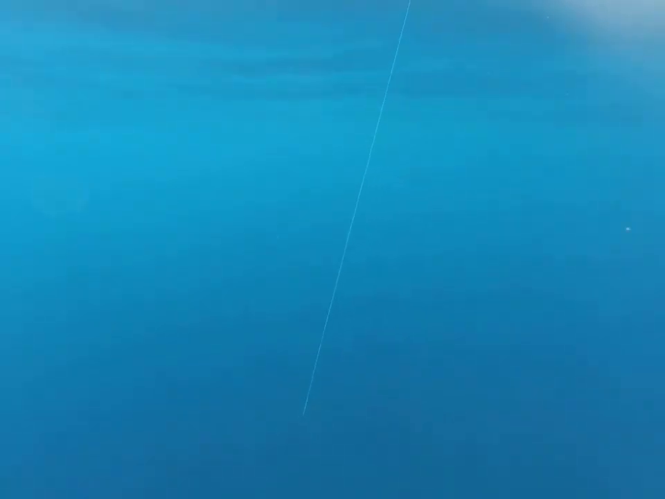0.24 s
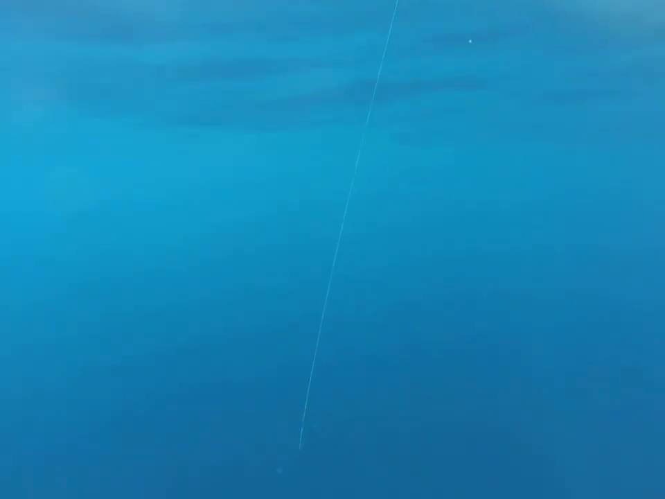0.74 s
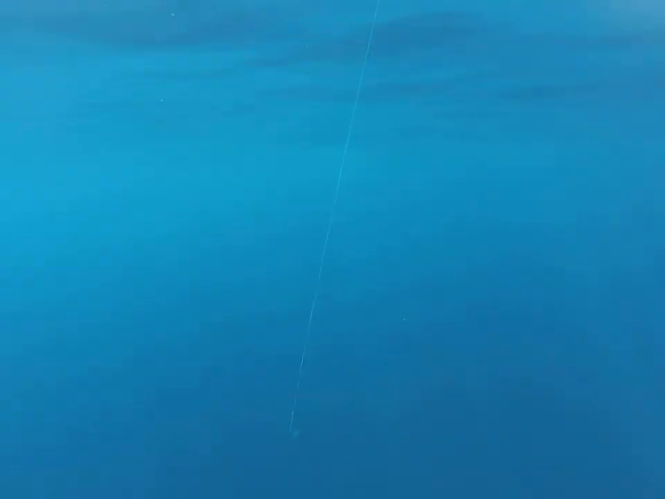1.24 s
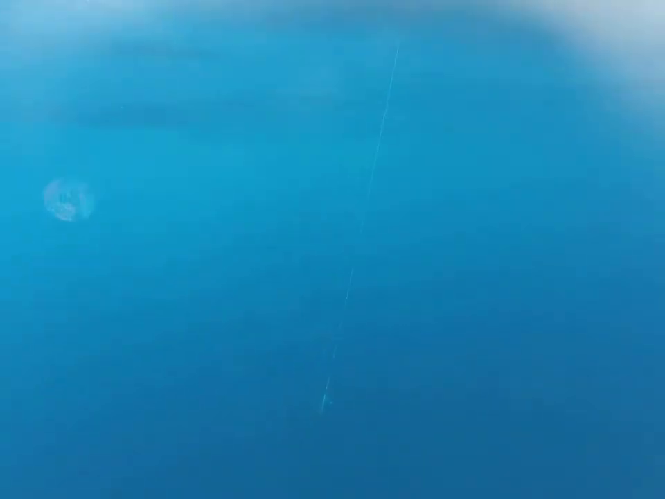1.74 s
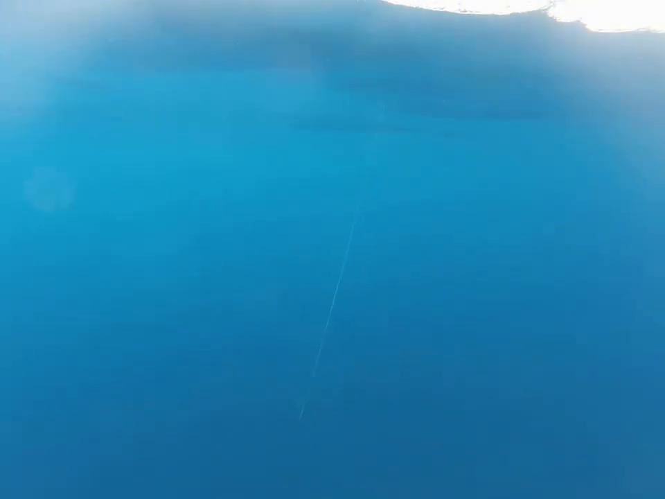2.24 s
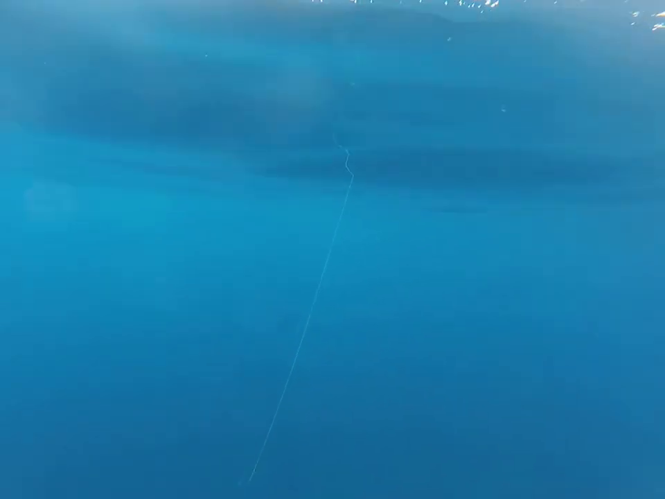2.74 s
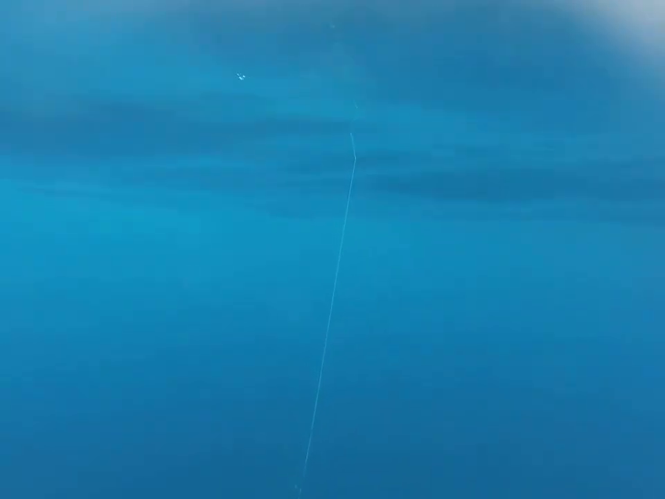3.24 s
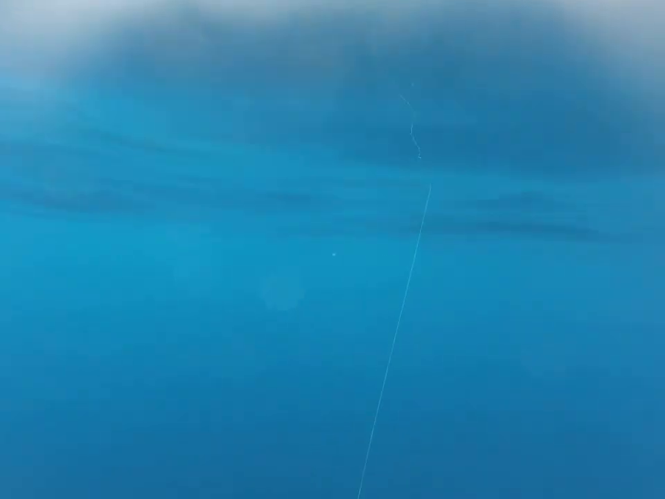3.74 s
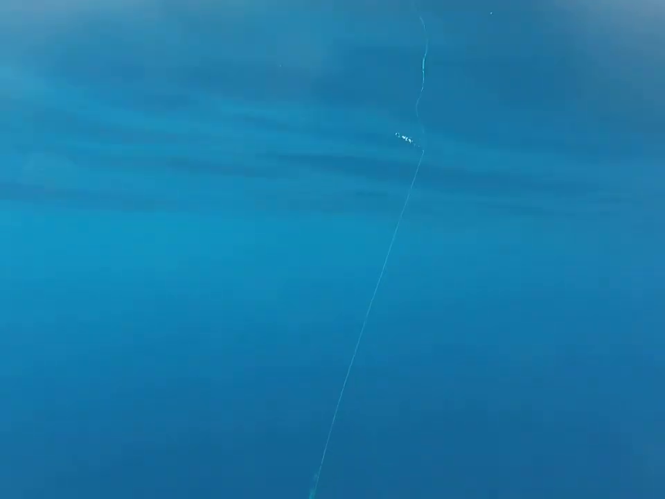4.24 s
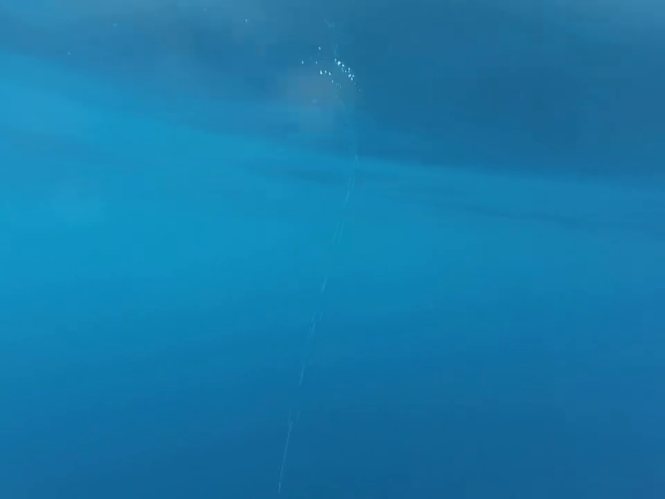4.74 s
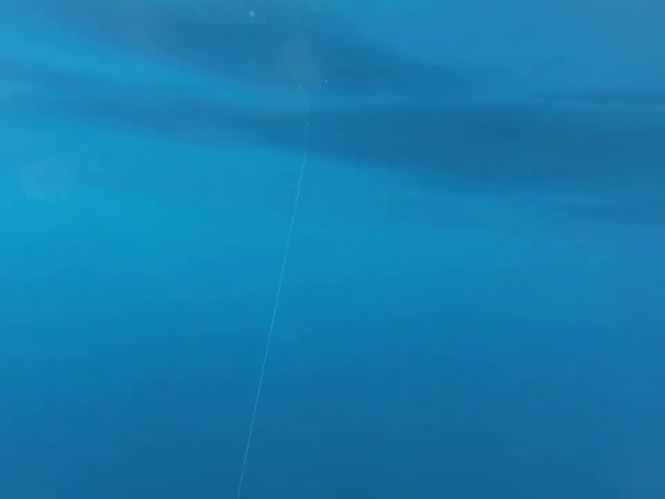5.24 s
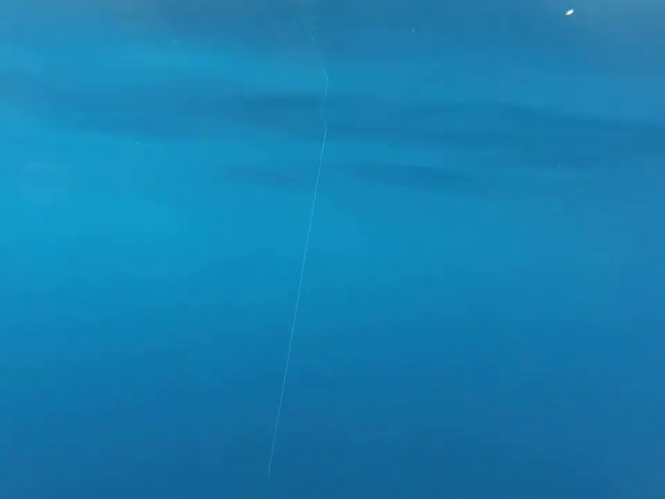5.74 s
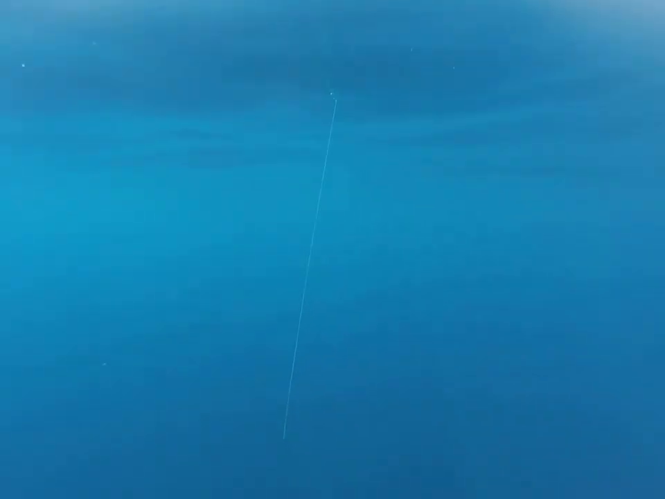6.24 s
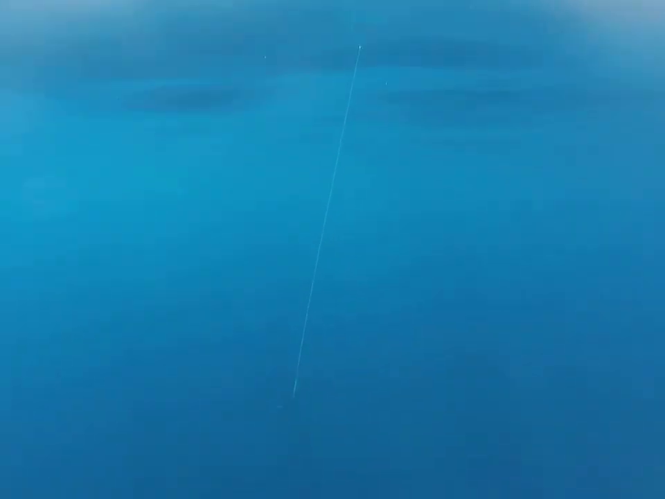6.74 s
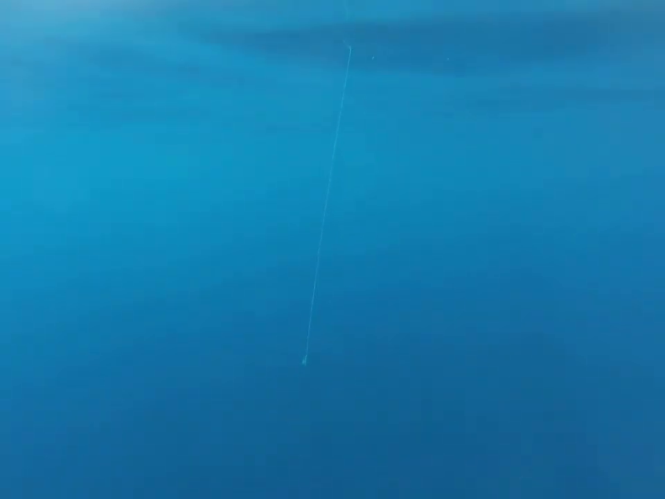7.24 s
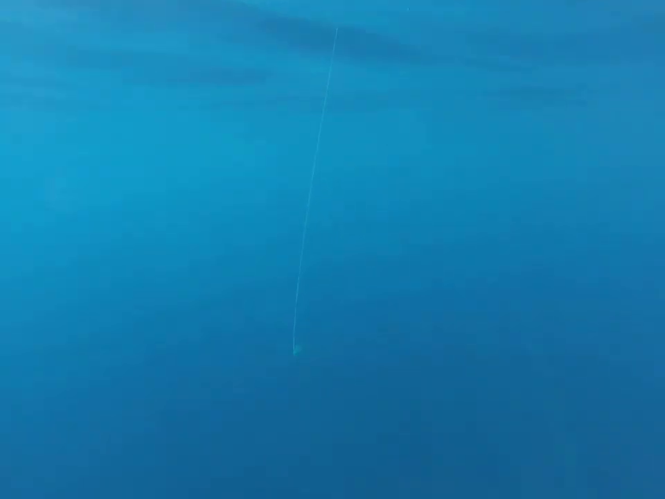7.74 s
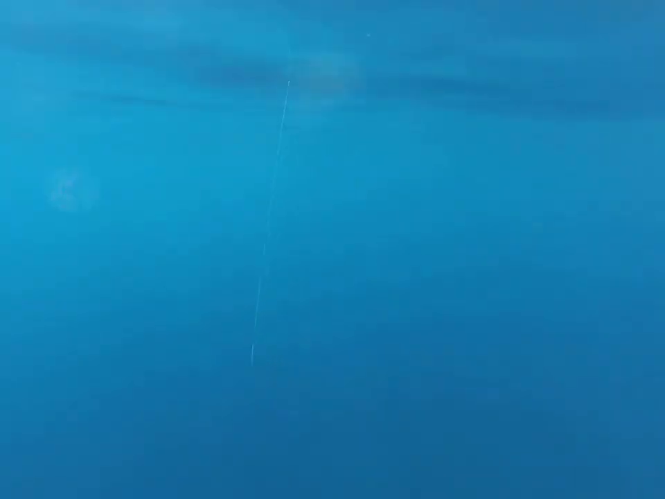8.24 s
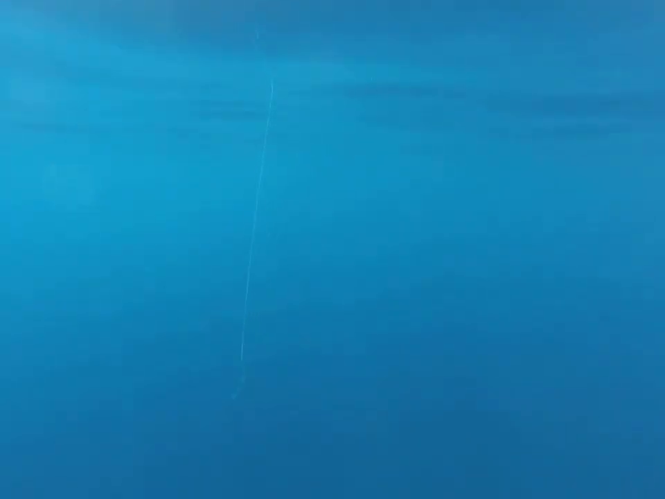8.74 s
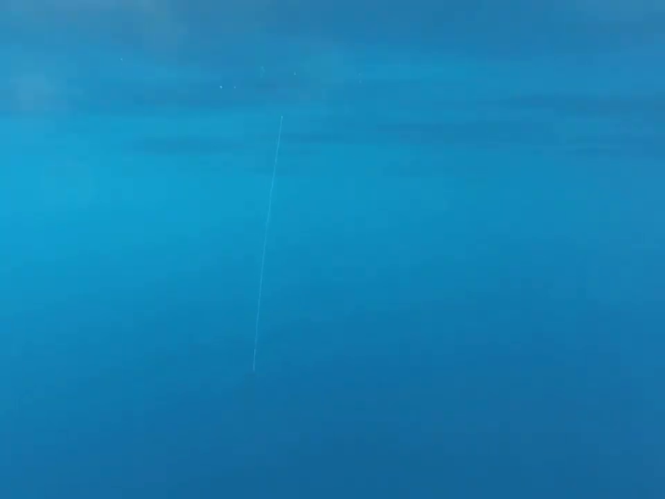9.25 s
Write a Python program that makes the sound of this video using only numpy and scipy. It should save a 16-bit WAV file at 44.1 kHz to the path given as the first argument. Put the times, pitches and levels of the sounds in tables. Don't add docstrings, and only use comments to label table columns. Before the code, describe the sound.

Muffled engine drone and quick ticking inside a submerged housing, low swell thumps, then turbulent water rushes over it, knocking and gulping to the end.

```python
import sys
import numpy as np
from scipy import signal
from scipy.io import wavfile
from scipy.ndimage import uniform_filter1d

SR = 44100
rng = np.random.default_rng(int(sys.argv[2]) if len(sys.argv) > 2 else 0)


def invert_db(level):
    return 10 ** (np.asarray(level, dtype=float) / 20)


def unload_wav(signal):
    wavfile.write(
        sys.argv[1],
        SR,
        np.round(np.clip(np.atleast_2d(signal).T, -1, 1) * 32767).astype(np.int16),
    )


N = 418509

# (time [s], flow level [dB], froth [dB], chop [dB])
WASH = [(1.97, -48, -4, -5), (1.995, -28.5, 1, 0), (2.1, -35.5, -1.5, 7), (2.18, -29.5, 1.5, 6.5),
        (2.3, -28, 0.5, 2), (2.64, -29, 1.5, 0), (3.0, -28.5, 2.5, -3.5), (3.43, -27, -0.5, -0.7),
        (3.8, -26.5, 1.5, 0.5), (4.5, -25, 3.5, 2.5), (4.7, -26.5, 1, 1), (5.4, -26.5, -1, 2.4),
        (6.0, -25, 0, 2), (7.2, -28.5, 0.5, 1), (7.63, -28.5, 0, 1.5), (8.45, -26.5, 0, 5.5),
        (8.75, -31, 0, 1.5), (9.49, -27.5, -0.5, 7)]
# (frequency [Hz], width [Hz], level [dB])
CALM_MODES = [(490, 40, -19), (596, 32, 0), (892, 45, -16), (1345, 55, -14), (1610, 50, -26),
              (1800, 150, -25), (2160, 120, -29), (2520, 50, -28), (3260, 220, -45), (3920, 180, -48)]
CALM_SIDES = [-1, 1, -1, -1, -1, 1, -1, 1, 1, 1]
# (frequency [Hz], width [Hz], level [dB])
WASHED_MODES = [(513, 172, -3), (604.2, 65.7, 6), (948, 45, -16), (1278, 112, -14), (1720, 206, -14.5),
                (2140, 110, -33), (2475, 377, -24.5), (3240, 570, -35.5), (3770, 180, -36),
                (4530, 940, -47), (5484, 305, -37), (6870, 660, -40), (7920, 540, -52.5), (9200, 500, -78),
                (10520, 590, -50), (12200, 500, -59.5), (12700, 690, -59.5), (15100, 1600, -60)]
WASHED_SIDES = [1, -1, 1, 1, 1, -1, -1, -1, -1, 1, 1, 1, -1, 1, -1, 1, -1, 1]


def rms_one(x):
    return x / np.sqrt(np.mean(x ** 2) + 1e-20)


def evened(x, size=SR // 3):
    return x / np.sqrt(uniform_filter1d(x ** 2, size=size) + 1e-20)


def in_time(rows):
    s, level, *rest = np.transpose(rows)
    t = np.arange(N) / SR
    return [np.interp(t, s, level, -120, -120)] + [np.interp(t, s, c) for c in rest]


def drift(rate_hz):
    r = np.exp(-2 * np.pi * rate_hz / SR)
    settled = signal.lfilter([1], [1, -2 * r, r * r], rng.standard_normal(N + SR))[SR:]
    return rms_one(settled)


def band(x, low_hz, high_hz):
    return signal.sosfilt(signal.butter(2, [low_hz, high_hz], "band", fs=SR, output="sos"), x)


def low_pass(x, top_hz, order):
    return signal.sosfilt(signal.butter(order, top_hz, fs=SR, output="sos"), x)


def clicks(rows):
    out = np.full(N, 1e-18)
    for s, db, *_ in rows:
        out[round(s * SR)] = invert_db(db)
    return out


def marked(rows):
    out = np.zeros(N)
    for s, db in rows:
        out[round(s * SR)] = db
    return out


def dying(x, t60_s):
    return signal.lfilter([1], [1, -invert_db(-60 / (t60_s * SR))], x)


def housing(push, modes, sides):
    out = []
    for (hz, width, db), side in zip(modes, sides):
        r = np.exp(-np.pi * width / SR)
        rung = signal.lfilter([1, 0, -1], [1, -2 * r * np.cos(2 * np.pi * hz / SR), r * r], push)
        out.append(side * invert_db(db) * (1 - r * r) / 2 * rung)
    return np.array([m[0] for m in modes]), np.array(out)


def resonance(push, hz, width):
    return housing(push, [(hz, width, 0)], [1])[1][0]


def engine():
    # (time [s], main level [dB], upper-mode strain [dB])
    engine_levels = [
        (0.0, -28, -3),
        (0.3, -30.5, 1),
        (0.45, -29.5, 4.5),
        (0.75, -25.5, 4),
        (1.0, -23.5, -1),
        (1.3, -24.5, 3.5),
        (1.45, -30, 1),
        (1.93, -26, 0.5),
        (1.975, -44, -9),
    ]
    first_tick_s, throb_period_s, throb_lag_s, throb_db = 0.03, 0.11, 0.024, 1
    main_db, strain_db = in_time(engine_levels)
    upper_db = np.where(main_db > -100, -48 + strain_db, main_db)
    phase = 2 * np.pi * (np.arange(N) / SR - first_tick_s - throb_lag_s) / throb_period_s
    main_db = main_db + throb_db * np.cos(phase)
    hz, rings = housing(rng.standard_normal(N), CALM_MODES, CALM_SIDES)
    lines = np.array([resonance(ring, f, 2.0 * w) for ring, (f, w, _) in zip(rings, CALM_MODES)])
    rings = lines + invert_db(0.5) * rings
    low = band(rings[hz < 1000].sum(axis=0), 320, 1100)
    whine = np.sin(2 * np.pi * np.cumsum(596 + 4.5 * drift(9)) / SR)
    upper = low_pass(rings[hz > 1000].sum(axis=0), 2000, order=3)
    hum = invert_db(main_db + 2.5) * evened(rms_one(low) + 0.77 * whine, SR // 8)
    return hum + invert_db(upper_db + 7.5) * rms_one(upper)


def surge():
    # (time [s], swell level [dB], churn level [dB])
    pressure = [(0.0, -31, -32.5), (0.4, -27, -34.5), (0.56, -32.5, -33), (0.95, -22.5, -35.5),
                (1.15, -24, -31), (1.85, -21.5, -32.5), (2.1, -27, -48), (2.4, -23, -27), (2.6, -26, -46),
                (3.1, -32.5, -42), (4.0, -32.5, -28), (4.75, -28, -30.5), (5.8, -32.5, -31),
                (6.6, -29.5, -25.5), (7.2, -32, -20.5), (7.8, -31, -27), (8.27, -19.5, -35.5),
                (9.49, -35.5, -40)]
    deep_db, throb_db = in_time(pressure)
    flow_db, _, chop_db = in_time(WASH)
    gurgle_gain = np.hypot(invert_db(throb_db - 1.5), invert_db(flow_db - 0.62 * chop_db + 2.5))
    white = rng.standard_normal((2, N))
    hull_share = np.interp(np.arange(N) / SR, (4.3, 4.2), [0.68, 0.4])
    deep = rms_one(band(white[0], 19.5, 42.8)) + hull_share * rms_one(band(white[1], 61.0, 77.8))
    lumps = rng.standard_normal(N) * (rng.random(N) < 300 / SR)
    lumps = (lumps + 0.073 * white[1]) * invert_db(2.17 * drift(44))
    throb = invert_db(throb_db + 1.8 * drift(11.0)) * evened(band(band(lumps, 116.0, 206.0), 95, 280))
    bubbling = evened(band(lumps * rng.choice([-1, 1], N), 208, 532))
    gurgle = gurgle_gain * invert_db(1.02 * drift(8.0)) * bubbling
    return invert_db(deep_db + 2.4 * drift(3.3)) * evened(deep) + throb + gurgle


def slaps():
    # (time [s], peak level [dB])
    drops = [
        (1.296, -11),
        (1.349, -4),
        (1.418, -5.5),
        (1.4865, -5.5),
        (1.662, -3.5),
    ]
    # (time [s], peak level [dB])
    cracks = [(0.0004, -29.5), (1.3613, -40), (1.4204, -42), (1.4411, -55), (1.4424, -42), (1.489, -27),
              (1.4954, -34), (1.6851, -44), (1.748, -32), (1.7564, -47), (1.8083, -43), (1.945, -36),
              (1.9514, -26)]
    # (time [s], peak level [dB])
    jolts = [(1.2, -12), (1.9, -6), (1.745, -12), (1, -9), (2.8, -10), (2.8, -10), (3.2, -5), (1.1, -8),
             (1.1, -17), (8.678, 3.5), (1.7, -10), (1.81, -19), (1, -7.5), (1.4855, 6.5), (2.1, -14)]
    # (time [s], peak level [dB])
    pops = [
        (5.4173, -30),
        (6.2679, -38),
        (8.7757, -41),
    ]
    # (time [s], peak level [dB])
    crackle = [(0.0189, -53), (0.2244, -43), (0.2813, -60), (0.413, -59), (0.4474, -58), (0.5087, -54),
               (0.5292, -57), (0.7297, -60), (0.7826, -57), (1.0001, -53), (1.045, -52), (1.0984, -54)]
    snap = dying(clicks(cracks), 0.0067) * rng.standard_normal(N)
    hits = clicks(drops)
    knocks = hits + 0.27 * dying(hits, 0.034) * rng.standard_normal(N)
    rung = housing(band(knocks, 300, 1800), CALM_MODES[1:6], CALM_SIDES)[1].sum(axis=0)
    body = band(band(clicks(jolts), 60, 330), 53, 500)
    out = invert_db(27.5) * rung - invert_db(28.0) * body
    out += invert_db(18.0) * low_pass(band(knocks, 160, 900), 2070, order=6)
    out += invert_db(2.0) * band(snap, 1500, 8000)
    out += invert_db(15) * band(clicks(pops), 8500, 15000)
    return out + invert_db(19.5) * band(band(clicks(crackle), 4800, 6600), 4500, 7000)


def ticks():
    # (time [s], peak level [dB])
    turn_ticks = [(0.0327, -26.5), (0.117, -31), (0.197, -28), (0.285, -28), (0.3627, -27), (0.4474, -35),
                  (0.5353, -26), (0.6175, -33), (0.6975, -27), (0.7786, -28), (0.8589, -34), (0.946, -31),
                  (1.0265, -30), (1.108, -36), (1.1904, -27.5), (1.2785, -31), (1.359, -27),
                  (1.4406, -23.5), (1.523, -24.5), (1.6053, -37), (1.6871, -28.5), (1.7814, -42),
                  (1.8766, -36)]
    # (time [s], peak level [dB])
    strays = [(0.0922, -52), (0.1774, -40), (0.3844, -56), (0.4299, -54), (0.4624, -55), (0.5574, -47),
              (0.687, -31), (0.8044, -46), (0.225, -48), (0.248, -50), (0.34, -44), (1.105, -50),
              (1.402, -29), (0.0732, -40), (0.5003, -43), (0.7477, -36), (0.832, -42), (1.1613, -40)]
    rows = [(s, db + 0.5) for s, db in turn_ticks] + strays
    loose = rng.random((40, 2))
    loose_s = (np.arange(len(loose)) + loose[:, 0]) / 14.0
    loose_rows = list(zip(loose_s, -40.5 + 10.0 * loose[:, 1]))
    rows += loose_rows[:np.sum(loose_s < WASH[0][0])]
    at = [round(s * SR) for s, _ in rows]
    colour_db = 1.8 * rng.standard_normal((len(rows), len(CALM_MODES)))
    rattle = rng.choice([-1, 1], N)
    out = 0
    for k, (hz, width, db) in enumerate(CALM_MODES[3:]):
        strikes = clicks(rows)
        strikes[at] *= invert_db(colour_db[:, k] + 5.1 * np.log2(hz / 2500))
        burst = dying(strikes, 0.035) * rattle
        rung = housing(burst, [(hz, width, db)], [1])[1][0]
        out = out + resonance(rung, hz, 3.8 * width) + 0.091 * rung
    return invert_db(42.5) * low_pass(out, 3500, order=3)


def thumps():
    # (time [s], peak level [dB], swing frequency [Hz])
    swings = [(0.281, -27, 68.6), (0.857, -22, 70.0), (0.997, -10, 68.5), (1.094, -9.5, 71.4),
              (1.358, -14, 71), (1.429, -14, 71), (1.4842, -7, 65.6), (1.562, -18, 73), (1.68, -8, 71.4),
              (1.748, -5.5, 70), (1.807, -24, 69), (1.923, -14, 67.1), (1.943, -2.5, 73), (2.19, -11, 71),
              (1.158, -12, 125), (1.176, -12, 110), (1.44, -7, 80), (1.572, -13.5, 151), (1.582, -14, 76),
              (1.669, -9, 120), (0.932, -22, 60), (1.869, -16.5, 70), (1.897, -10, 55), (2.385, -16, 50),
              (1.195, -9.5, 70)]
    directions = [-1, -1, 1, -1, -1, 1, -1, -1, 1, -1, 1, 1, 1, -1, -1, 1, -1, 1, 1, -1, -1, -1, -1, 1, -1]
    out = np.zeros(N)
    for (s, db, hz), sign in zip(swings, directions):
        turn = np.arange(int(SR / hz)) * hz / SR
        at = round(s * SR)
        out[at:at + len(turn)] += sign * invert_db(db + 2.0) * np.sin(2 * np.pi * turn) * np.exp(-0.6 * turn)
    return out


def swarm():
    # (start [s], end [s], rate [1/s], lowest pitch [Hz], highest pitch [Hz])
    swarms = [
        (7.5, 9.45, 7, 211, 510),
        (1.0, 2.3, 30, 60, 220),
    ]
    rows, draws = [], rng.random((len(swarms), 64, 3))
    for (start, end, rate, low_hz, high_hz), draw in zip(swarms, draws):
        s = start + (np.arange(len(draw)) + draw[:, 0]) / rate
        pitch_hz = low_hz * (high_hz / low_hz) ** draw[:, 2]
        bubbles = list(zip(s, -12 - 10 * draw[:, 1], pitch_hz))
        rows += bubbles[:np.sum(s < end)]
    return rows


def gulps():
    # (time [s], peak level [dB], pitch [Hz])
    passing = [(8.089, -14, 368), (8.187, -12, 410), (8.296, -7, 419), (8.345, -11.5, 386),
               (8.403, -5.5, 375), (8.51, -9.5, 300), (8.565, -7, 353), (8.675, -12.5, 211),
               (8.767, -10, 448), (8.816, -9, 442), (9.166, -8, 422), (9.263, -9.5, 384), (9.361, -14, 385),
               (8.2726, -21, 2170), (8.3780, -10, 2170), (8.27, -30, 4000), (8.308, -37, 4050),
               (8.383, -35, 3900), (8.432, -31, 3370), (8.21, -37, 3400), (8.19, -18.5, 1810),
               (8.306, -23, 1790), (8.502, -20, 1840), (2.701, -16, 71.6), (3.279, -13, 72),
               (4.272, -19, 69.6)]
    big_below_hz, big_t60_s = 100, 0.3
    out, t = np.zeros(N + SR), np.arange(SR // 4) / SR
    for rows, small_t60_s, rise in ((passing, 0.085, 6.0), (swarm(), 0.078, 5.0)):
        for s, db, hz in rows:
            t60_s = big_t60_s if hz < big_below_hz else small_t60_s
            swell = 1 - np.exp(-t * min(hz, 300) / 0.5)
            glide = 1 + rise * t * (hz > big_below_hz) * min(1, 500 / hz) ** 2
            at = round(s * SR)
            out[at:at + len(t)] += invert_db(db - 60 * t / t60_s) * swell * np.sin(2 * np.pi * hz * t * glide)
    return out[:N]


def flow():
    # (time [s], lift [dB])
    gushes = [(2.009, 4.5), (2.11, 3.5), (2.28, 2), (2.36, 3.5), (2.69, 2), (2.75, 3), (2.97, 4),
              (3.32, 5.5), (3.79, -0.5), (3.83, 3), (4.2, 1), (4.36, 2), (4.52, 2), (4.77, 1.5), (4.847, 5),
              (5.13, 0.5), (5.44, 4), (6.45, -0.5), (6.78, 2), (6.95, 0.5), (7.08, -1.5), (7.16, 2.5),
              (7.28, 2.5), (7.41, 3), (8.31, 1), (8.38, 3), (8.592, 4.5), (8.92, 1.5), (8.98, 2), (9.27, 4)]
    gush_s = 0.0078
    t = np.arange(-SR // 10, SR // 10 + 1) / SR
    shape = np.exp(-(t / gush_s) ** 2 / 2)
    return *in_time(WASH), signal.fftconvolve(marked(gushes), shape, "same")


def spray():
    sizes = invert_db(4.2 * np.minimum(rng.exponential(1, N), 5)) * rng.choice([-1, 1], N)
    grains = rms_one(sizes * (rng.random(N) < 2500 / SR))
    eddies = invert_db(0.84 * rms_one(band(rng.standard_normal(N), 9.7, 39.5)) + 0.74 * drift(50))
    return (0.65 * grains + rng.standard_normal(N)) * eddies


def whistle(hz, rings):
    # (start [s], end [s], frequency [Hz], lift [dB])
    jets = [
        (5.1, 5.46, 12900, 7),
        (5.1, 5.46, 5470, 4),
    ]
    for start, end, jet_hz, lift_db in jets:
        open_db = np.interp(np.arange(N) / SR, [start - 0.12, start, end, end + 0.076], [0, lift_db, lift_db, 0])
        rings[np.argmin(abs(hz - jet_hz))] *= invert_db(open_db)


def hollowed(x):
    # (frequency [Hz], width [Hz], share removed [0-1])
    valleys = [(2270, 86, 0.59), (3510, 120, 0.7), (5050, 200, 0.53), (6130, 250, 0.72)]
    for hz, width, share in valleys:
        x = x - share * resonance(x, hz, width)
    return x


def slug_hits(swing_db):
    # (time [s], peak level [dB])
    slug_strikes = [(1.995, -8), (2.014, -14), (2.265, -7), (2.363, -7.5), (2.389, -7.5), (2.459, -5.5),
                    (2.534, 1.5), (3.075, -12), (3.133, -6), (8.524, -11), (8.914, -9.5), (8.978, -0.5),
                    (1.978, -11), (2.051, -2), (2.085, -16), (2.194, -8), (2.593, -4.5), (2.651, -3.5),
                    (2.75, -2.5), (2.777, -3), (2.818, -7), (2.895, -5.5), (3.012, -4.5), (3.117, -5),
                    (3.249, -12), (3.276, -13), (3.348, -7), (3.477, -3.5), (3.661, -2), (3.76, -11),
                    (3.811, -4.5), (3.857, -7), (3.913, -3), (3.998, -4.5), (4.064, -4), (4.204, -4),
                    (4.289, -2.5), (4.385, -6), (4.502, -6), (4.607, 0), (4.773, -7), (4.85, -2),
                    (4.888, -3.5), (5.041, -7), (5.086, -21), (5.146, 1), (5.205, -5), (5.311, -6),
                    (5.407, -5.5), (5.446, -15), (5.524, -8), (5.556, -3), (5.661, -7), (5.744, -2),
                    (5.856, -14), (5.981, -8), (6.101, -7), (6.137, -14), (6.221, -6), (6.3, -5.5),
                    (6.458, -5), (6.522, -8), (6.58, -7), (6.652, -2.5), (6.714, -11), (6.793, -6),
                    (6.898, -2.5), (7.029, -8), (7.155, -7), (7.285, 0), (7.323, -7.5), (7.379, -6),
                    (7.493, -2), (7.546, 1.5), (7.573, -1), (7.654, -14), (7.696, -3), (7.742, -6.5),
                  (7.79, -14), (7.84, -6.5), (7.896, -10), (7.927, -11), (7.974, -5), (8.004, -9),
                  (8.031, -9), (8.098, -2.5), (8.183, -14), (8.203, -9), (8.236, -2.5), (8.273, -8),
                  (8.414, -17), (8.439, -3), (8.468, -14), (8.563, -9.5), (8.615, -1), (8.659, -8),
                  (8.724, -0.5), (8.774, 1), (8.811, -6), (8.937, -12), (8.967, -2), (9.033, -2.5),
                  (9.076, -3), (9.168, -5.5), (9.226, -3.5), (9.271, -3.5), (9.3, -0.5), (9.367, -6),
                  (9.391, -11), (9.429, -13), (9.45, -6), (9.473, -14)]
    small = (rng.random(N) < 2.6 / SR) * invert_db(-9.5 + swing_db + 0.83 * rng.standard_normal(N))
    return clicks(slug_strikes) + small


def wash():
    flow_db, froth_db, chop_db, gush_db = flow()
    mean_flow_db = -28
    swing_db = flow_db - mean_flow_db + gush_db
    # (level over the flow [dB], share of its swing, share of froth)
    groups = ((12.34, 0.89, -0.33), (0.0, 1, 0.0), (-13.5, 1.4, 0.1), (-22.5, 0.76, 2.4), (-28.5, 0.86, 0.4))
    main_db, middle_db, high_db, top_db, air_db = [
        mean_flow_db + db + share * swing_db + frothy * froth_db for db, share, frothy in groups]
    hz, rings = housing(spray(), WASHED_MODES, WASHED_SIDES)
    wander = uniform_filter1d(rng.standard_normal((len(hz), N // 256 + 1)), size=60, axis=1)
    wander = np.repeat(rms_one(wander), repeats=256, axis=1)
    rings[hz > 1000] *= invert_db(1.36 * wander[hz > 1000, :N])
    whistle(hz, rings)

    low = rms_one(low_pass(rings[hz < 1000].sum(axis=0), 1900, order=3))
    steadied = 0.47
    low = rms_one(steadied * evened(low, SR // 60) + (1 - steadied) * low)
    choppy = rms_one(band(rng.standard_normal(N), 11.0, 37.6))
    low *= invert_db(main_db - 0.36 * chop_db + 0.67 * chop_db * choppy)
    middle = invert_db(middle_db) * rms_one(band(rings[(hz > 1000) & (hz < 3000)].sum(axis=0), 1010, 3390))
    high = invert_db(high_db) * rms_one(band(rings[(hz > 3000) & (hz < 6000)].sum(axis=0), 2470, 5440))
    top = invert_db(top_db) * rms_one(band(rings[(hz > 6000) & (hz < 8500)].sum(axis=0), 5900, 12200))
    top += invert_db(air_db) * rms_one(band(rings[hz > 8500].sum(axis=0), 7000, 15000))

    slugs = slug_hits(swing_db)
    rise_s, fall_s = 0.0027, 0.01
    t = np.arange(SR // 20) / SR
    shape = np.exp(-t / fall_s) * (1 - np.exp(-t / rise_s))
    low *= 0.9 + 0.4 * signal.fftconvolve(slugs, shape / shape.max())[:N]
    soft = band(band(slugs, 428, 790), 380, 1500)
    _, knocked = housing(soft, WASHED_MODES[:3], WASHED_SIDES)
    knock = knocked[1] + 0.54 * knocked[0] + knocked[2]
    return low + hollowed(middle + high + top) + invert_db(38.0) * knock


def ducking():
    # (time [s], depth [dB])
    ducks = [(1.496, 14.5), (1.761, 5.5), (1.953, 6.5), (2.159, 6.5), (2.56, 0.5), (2.785, 4), (3.37, 4.5),
             (3.49, 3.5), (3.709, 6.5), (4.215, 3.5), (4.369, 5), (5.012, 7.5), (5.34, -5), (5.501, 4),
             (5.565, 6.5), (5.91, -3), (6.158, 7.5), (6.25, 5.5), (6.479, 7.5), (7.56, 6.5), (8.12, 7),
             (8.162, 8.5), (8.243, 7), (8.33, 7), (8.625, 0), (8.745, 5), (8.784, 4.5), (8.986, 3.5),
             (9.085, 3.5), (9.319, 5.5)]
    attack_s, recover_db_per_s = 0.0023, 159
    ramp = recover_db_per_s * np.arange(N) / SR
    r = np.exp(-1 / (attack_s * SR))
    depth_db = np.maximum.accumulate(marked(ducks) + ramp) - ramp
    return invert_db(-signal.lfilter([1 - r], [1, -r], depth_db))


def scene():
    hiss = invert_db(-61) * low_pass(rng.standard_normal(N), 7000, order=1)
    duck = ducking()
    steady = duck * (engine() + ticks() + wash() + hiss) + duck ** 1.75 * surge()
    return (steady + thumps() + slaps() + gulps())[None]


def top_cut(x):
    return signal.sosfilt(signal.butter(12, 15690, fs=SR, output="sos"), x)


def record(dry):
    attack_s, recover_db_per_s = 0.0011, 70
    over_db = np.maximum(20 * np.log10(np.abs(dry) + 1e-9) + 4.4, 0)
    ramp = recover_db_per_s * np.arange(N) / SR
    duck_db = np.maximum.accumulate(over_db + ramp, axis=1) - ramp
    r = np.exp(-1 / (attack_s * SR))
    held = np.clip(dry * invert_db(-signal.lfilter([1 - r], [1, -r], duck_db)), -0.98, 0.98)
    held = signal.sosfilt(signal.ellip(12, 0.5, 40, 15330, fs=SR, output="sos"), held)
    return top_cut(held)


dry = scene()
out = record(dry)
unload_wav(out)
```